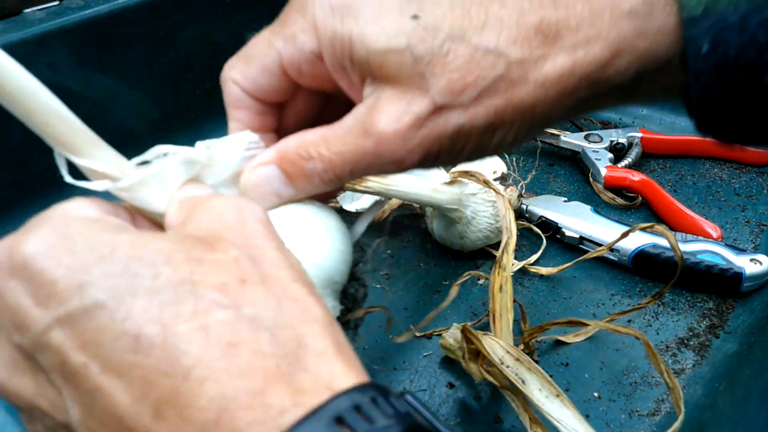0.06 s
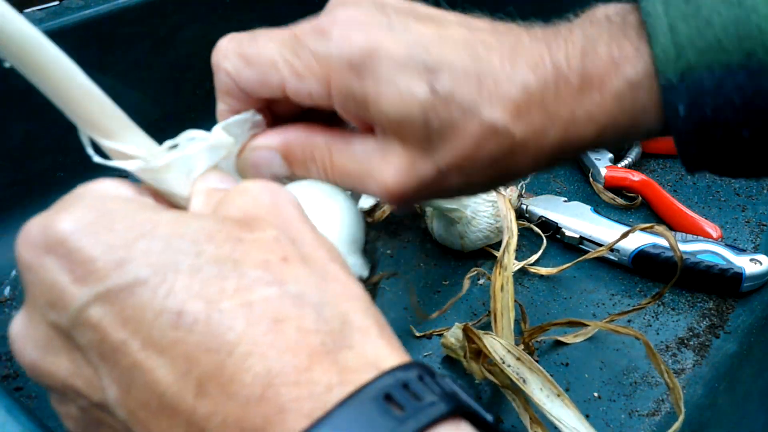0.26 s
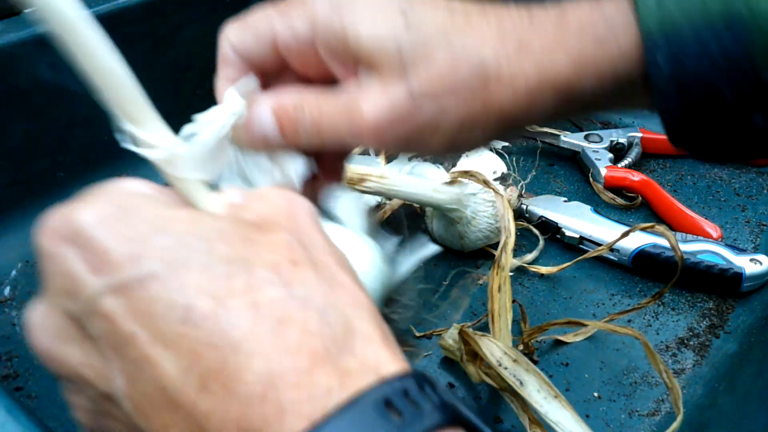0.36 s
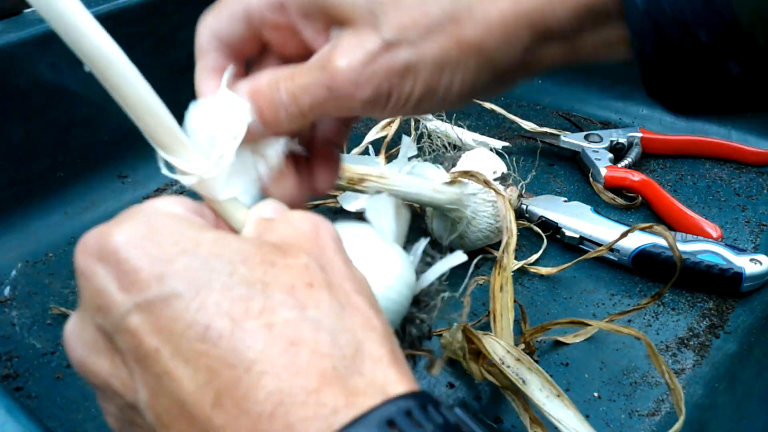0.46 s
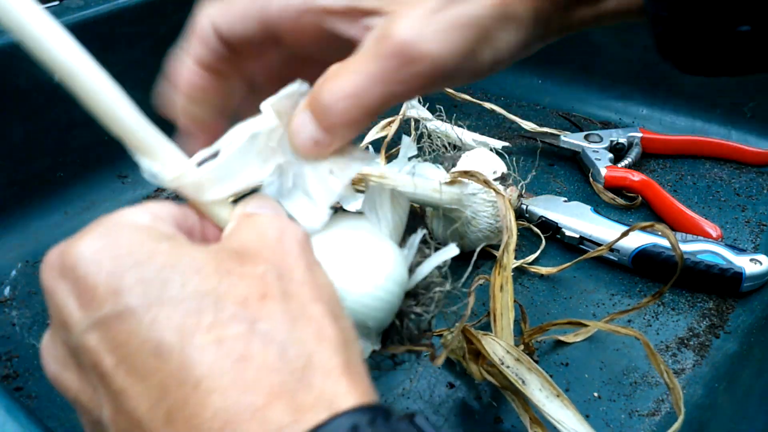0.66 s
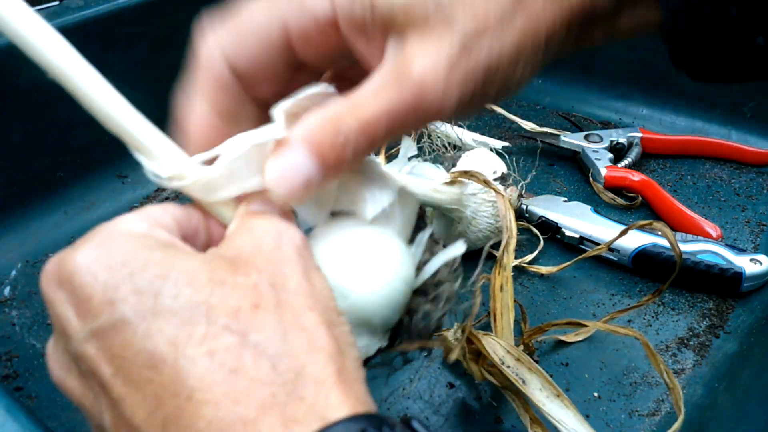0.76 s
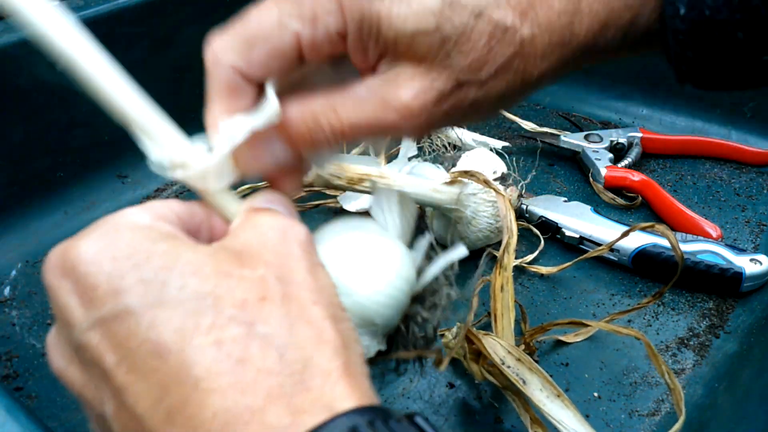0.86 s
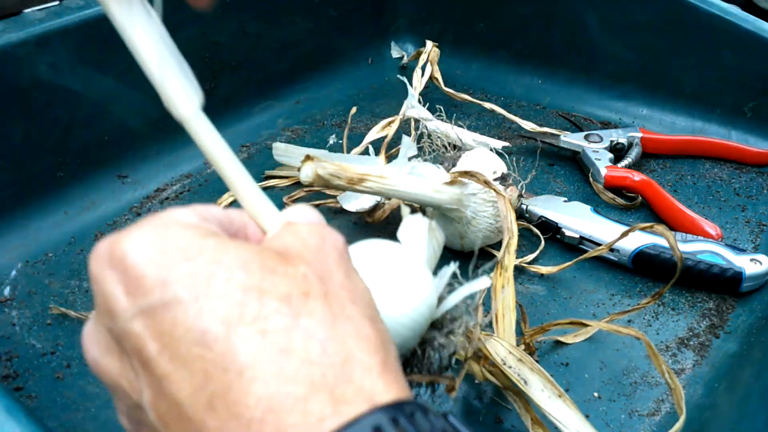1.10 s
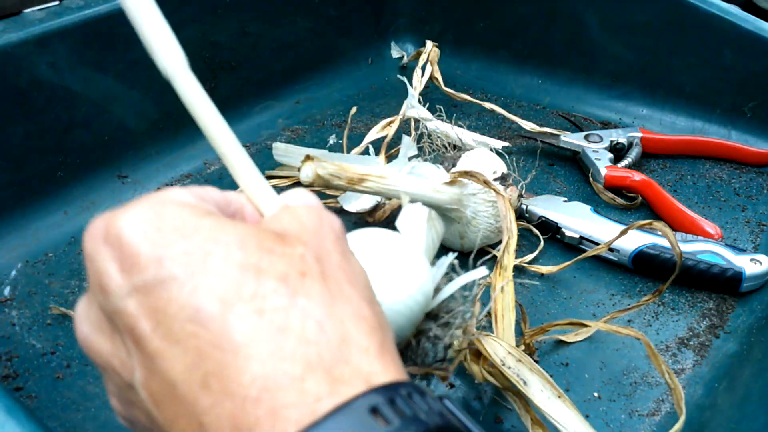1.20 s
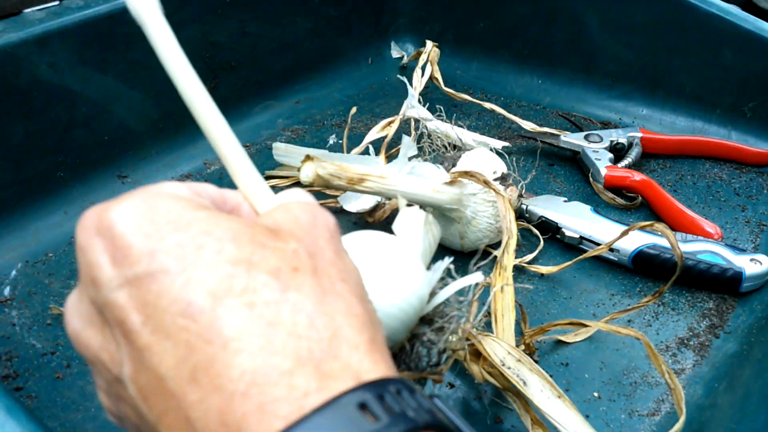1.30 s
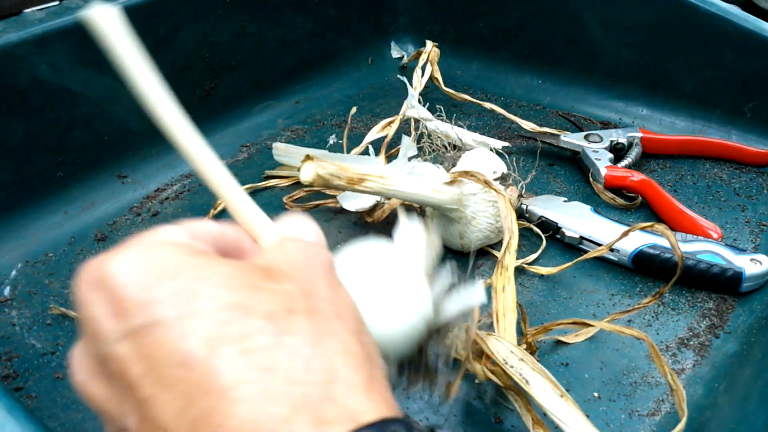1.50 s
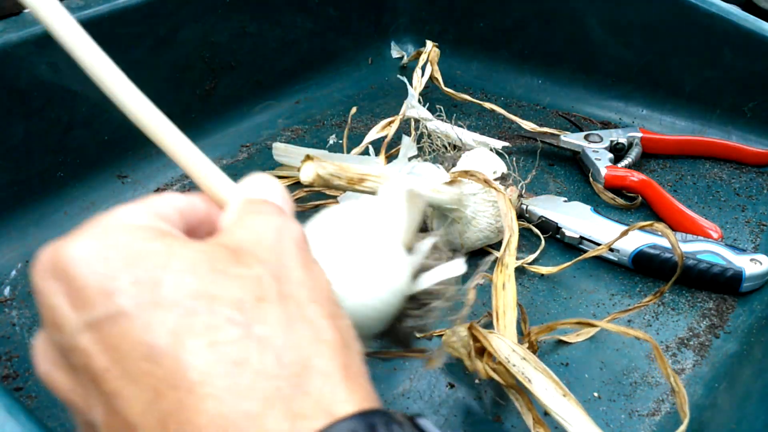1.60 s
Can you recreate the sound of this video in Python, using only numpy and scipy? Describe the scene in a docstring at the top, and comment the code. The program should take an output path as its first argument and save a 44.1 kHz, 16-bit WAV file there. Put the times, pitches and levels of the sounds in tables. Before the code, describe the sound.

Dry garlic skin is peeled by hand close to the microphone: a faint rustle, a sudden crackling rip, sparse papery crinkles along the stalk, then one last snap, over a faint low hum.

```python
"""Peeling a garlic bulb

Dry skin is peeled off a garlic bulb by hand, close to the microphone: it crinkles, rips in a quick run of snaps,
slides up the stalk with a papery rustle and lets go with one last snap. Clicks make the snaps, random crackle the
tearing and rustling, noise and a wandering tone the handling. A plastic tub rings faintly, and a low hum lies
underneath. The microphone rings sharply near 7 kHz and passes little above."""
import sys
import numpy as np
from scipy import signal
from scipy.fft import rfft, irfft, next_fast_len
from scipy.io import wavfile
from scipy.ndimage import uniform_filter1d, map_coordinates

SR = 44100
rng = np.random.default_rng(int(sys.argv[2]) if len(sys.argv) > 2 else 0)


def master(y):
    """Save y as 16-bit WAV."""
    cut = np.clip(np.atleast_2d(y).T, -1, 1)
    pcm = np.round(cut * 32767)  # scale
    wavfile.write(sys.argv[1], SR, pcm.astype(np.int16))


N = 72765
T = np.arange(N) / SR  # time in s


def amp(db):
    """Logarithmic level: 20 dB is a factor of ten in amplitude."""
    return 10 ** (np.asarray(db) / 20)


def unit(x):
    """Power normalisation: scale to rms 1."""
    return x / np.sqrt(np.mean(x ** 2) + 1e-20)


def along(points, hz):
    """Logarithmic frequency scale: interpolate (frequency, value) points along it."""
    f, v = np.transpose(points)
    return np.interp(np.log(hz + 1), np.log(f + 1), v)


def curve(rows, axis=1):
    """Linear interpolation: one column of a time table, per sample."""
    cols = np.transpose(rows)
    return np.interp(T, cols[0], cols[axis])


def coloured(x, points, lag=1):
    """Cepstral filter design: minimum phase at lag 1, nearer zero phase and tighter in time below that."""
    m = 2 * next_fast_len(N)
    response_db = along(points, np.fft.rfftfreq(m, 1 / SR))
    cepstrum = irfft(np.log(amp(response_db)), m)
    cepstrum[1:m // 2] *= 1 + lag
    cepstrum[m // 2 + 1:] *= 1 - lag
    response = np.exp(rfft(cepstrum))
    return irfft(rfft(x, m) * response, m)[:N]


def crackle(per_s, spread_db, hiss_db):
    """Random impulse process: tiny cracks of uneven size and either sign over a smooth hiss, rms 1."""
    sizes = amp(spread_db * np.minimum(rng.exponential(size=N), 3))
    happens = rng.random(N) < per_s / SR
    cracks = happens * sizes * rng.choice([-1, 1], N)
    hiss = amp(hiss_db) * rng.standard_normal(N)
    return unit(unit(cracks) + hiss)


def dying(s, t60):
    """Exponential decay: an envelope that starts at s and falls 60 dB in t60 seconds."""
    return (T >= s) * np.exp(-np.log(1000) * np.abs(T - s) / t60)


def flaking(x):
    """Time-varying spectrum: patches of gain shift the colour every few milliseconds, as flakes differ."""
    flake_db = 3.5  # rms unevenness before the overall gain is normalised
    z = signal.stft(x, nperseg=256)[2]
    across_hz = uniform_filter1d(rng.standard_normal(z.shape), size=5, axis=0)
    field = uniform_filter1d(across_hz, size=4, axis=1)
    gain = unit(amp(flake_db * unit(field)))
    return signal.istft(z * gain, nperseg=256)[1][:N]


def wobble(per_s):
    """Band-limited random modulation: a smooth curve through per_s random points a second, rms 1."""
    return unit(map_coordinates(rng.standard_normal(N // 20), [T * per_s]))


# single fractures of the skin, levels before the skin's colour; body_db is below 5.2 kHz relative to the treble
# columns: start_s, level_db, body_db
FRACTURES = [(.2108, -15, 17), (.2303, -7, 7), (.235, -6, -1), (.258, -12, 4), (.2602, -7, -2),
             (.2617, -1.5, 1), (.2695, -10, 3), (.321, 0, -26), (.3235, -5, -18), (.3312, -5, -8),
             (.3414, 10.5, -8), (.3443, 10, -1), (.3504, 8, -1), (.3548, 0, 0), (.3605, 6.5, -5),
             (.3682, 8, -5), (.3705, 3, -6), (.374, -3, 5), (.3772, 4, -1), (.3838, 7, -4), (.386, 1, -3),
             (.3893, 0, 7), (.3922, -3, 5), (1.3791, 7, -3), (1.3825, -7, -1), (1.386, -11, -5),
             (1.3905, -13, -3), (.555, -19, 2), (.614, -16, -8), (.669, -17, -5), (.692, -19.5, -1),
             (.756, -18, 3), (.830, -24, 13), (.884, -9, -9), (.891, -13, -1), (.914, -13, -15),
             (.931, -14, -9), (1.007, -13, -20), (1.068, -8.5, -4), (1.45, -17, -10)]
# radiation of the skin; columns: frequency_hz, gain_db
SKIN_RESPONSE = [(60, -30), (300, -7), (600, -8), (1000, -1.5), (1600, -3), (2600, -.5), (4000, -5),
                 (7000, -1)]
SPLINTER_DB, SPLINTER_T60_S = -9, .015  # splinters of the hardest snap, relative to its click
SOFTEN, SOFTEST_DB = .9, 20  # extra splinter dB per dB of weakness, and its limit in dB
LINGER = .4  # dB of splinter decay time per dB of softness


def snaps():
    """Brittle fracture: a sharp click trailed by splinters; weak ones crinkle longer, broad pieces have more body."""
    out = np.zeros(N)
    low = signal.butter(4, 5200, fs=SR, output="sos")
    for s, db, body_db in FRACTURES:
        loudness_db = db + max(body_db, 0)
        soft_db = np.clip(-SOFTEN * loudness_db, 0, SOFTEST_DB)
        t60 = SPLINTER_T60_S * amp(LINGER * soft_db)
        click = crackle(per_s=6000, spread_db=3, hiss_db=-8) * dying(s, t60)
        click *= amp(SPLINTER_DB + soft_db) / np.linalg.norm(click)
        click[round(s * SR)] += 1
        click /= np.linalg.norm(click)
        body = (amp(body_db) - 1) * signal.sosfiltfilt(low, click)
        out += amp(db) * (click + body)
    return coloured(out, SKIN_RESPONSE)


# skin being pulled and torn, level before its colour; columns: time_s, level_db
TEAR_LEVEL = [(.17, -73), (.193, -41), (.201, -48), (.22, -40), (.233, -37.5), (.25, -38.5), (.263, -29.5),
              (.285, -36), (.31, -72.5), (.335, -30), (.343, -21), (.392, -24), (.402, -39), (.414, -54),
              (.427, -82), (.44, -81.5)]
# spectrum of the tearing; columns: frequency_hz, gain_db
TEAR_SPECTRUM = [(60, -38), (250, -5), (450, -1), (650, -5), (950, 1), (1400, 1), (1900, 5.5), (2300, 1.5),
                 (3000, 4), (4500, 1), (7000, -3)]
# fingernail scraping under the skin before it lifts; columns: time_s, level_db
SCRAPE_LEVEL = [(.19, -59), (.2, -31), (.215, -29.5), (.226, -32.5), (.25, -65.5)]
# spectrum of the scrape; columns: frequency_hz, gain_db
SCRAPE_SPECTRUM = [(200, -36), (600, -18), (850, -2.5), (1400, 2.5), (2300, 5.5), (3300, 2.5),
                   (7000, -17.5)]


def tearing():
    """Progressive fracture: the nail scrapes, then fibres break in a dense crackle while the skin is pulled."""
    fibres = flaking(crackle(per_s=1600, spread_db=4.5, hiss_db=-7))
    tear = coloured(amp(curve(TEAR_LEVEL)) * fibres, TEAR_SPECTRUM)
    nail = unit(coloured(crackle(per_s=1500, spread_db=4, hiss_db=-4), SCRAPE_SPECTRUM))
    return tear + amp(curve(SCRAPE_LEVEL)) * nail


# skin sliding on skin and fingers, level before its colour; columns: time_s, level_db
RUSTLE_LEVEL = [(0, -47.5), (.028, -46), (.075, -53), (.125, -63.5), (.19, -45.5), (.41, -43), (.44, -54),
                (.5, -61), (.6, -72), (.63, -46.5), (.66, -64.5), (.74, -59), (.768, -41.5), (.81, -59.5),
                (.865, -55), (.888, -39), (.91, -59.5), (.97, -49), (1.07, -46), (1.12, -51), (1.15, -59.5),
                (1.22, -49), (1.28, -43), (1.315, -48.5), (1.34, -47), (1.385, -41), (1.42, -54.5),
                (1.51, -72), (1.55, -57), (1.6, -44), (1.65, -68)]
# spectrum of the rustle; columns: frequency_hz, gain_db
RUSTLE_SPECTRUM = [(100, -5.5), (500, -1.5), (1200, 1.5), (2400, 2), (3500, 1.5), (5000, 2), (7000, 2)]


def rustling():
    """Crumpling noise: loose skin crinkles as it slides."""
    crinkles = flaking(crackle(per_s=1500, spread_db=3, hiss_db=-4))
    return coloured(amp(curve(RUSTLE_LEVEL)) * crinkles, RUSTLE_SPECTRUM)


# soft rub of the hand along the stalk, level of its friction noise before the catches
# columns: time_s, level_db
RUB_LEVEL = [(0, -61), (.7, -60), (.77, -55), (.85, -63), (.89, -52), (.93, -58), (1.05, -53), (1.19, -62),
             (1.28, -48.5), (1.32, -48.5), (1.365, -46.5), (1.43, -66), (1.65, -64.5)]
# spectrum of the friction; columns: frequency_hz, gain_db
RUB_SPECTRUM = [(80, -14), (300, -4), (600, -1), (880, 4.5), (1300, -3), (1700, 0), (2500, -4), (3500, -20),
                (7000, -15)]
# jolts of the bulb in the hand as the skin gives; columns: start_s, level_db
BULB_JOLTS = [(0.343, -23), (0.389, -34), (1.062, -43.5), (1.379, -44.5)]
# spectrum of the jolts; columns: frequency_hz, gain_db
JOLT_SPECTRUM = [(40, -32), (120, -13), (230, -3), (320, -8), (440, 5), (580, 3), (720, -3), (950, -3),
                 (5000, -60)]
JOLT_T60_S = 0.045
CATCHES_PER_S, CATCH_DB = 70, 3.5  # random points per s of the rub's unevenness, and its rms in dB
# the stalk chafes in the grip: centre pitch in Hz, rms wander of log pitch, dB relative to the friction
CHAFE_HZ, CHAFE_GLIDE, CHAFE_DB = 850, .09, -7


def handling():
    """Friction and impact: the hand rubs the stalk in uneven, faintly pitched catches, and the bulb jolts dully."""
    pitch_hz = CHAFE_HZ * np.exp(CHAFE_GLIDE * wobble(20))
    phase = 2 * np.pi * np.cumsum(pitch_hz) / SR
    chafe = unit(sum(np.sin(k * phase) * wobble(2 * CATCHES_PER_S) / k for k in (1, 2)))
    friction = unit(coloured(flaking(crackle(per_s=900, spread_db=7, hiss_db=7)), RUB_SPECTRUM))
    rub_db = curve(RUB_LEVEL) + CATCH_DB * wobble(CATCHES_PER_S)
    rub = amp(rub_db) * (friction + amp(CHAFE_DB) * chafe)
    jolt = sum(amp(db) * dying(s, JOLT_T60_S) for s, db in BULB_JOLTS)
    thud = unit(coloured(rng.standard_normal(N), JOLT_SPECTRUM))
    return rub + jolt * thud


# resonances of the plastic tub; columns: frequency_hz, width_hz, level_db
TUB_MODES = [(486, 53, -25.5), (840, 180, -15.5), (1042, 24, -6), (1890, 27, -0.5), (2940, 170, -3)]


def tub(x):
    """Modal resonance: the tub under the hands rings in narrow bands, each a second-order band-pass."""
    m = 2 * next_fast_len(N)
    f = np.fft.rfftfreq(m, 1 / SR)
    response = sum(amp(db) * 1j * f * w / (hz * hz - f * f + 1j * f * w) for hz, w, db in TUB_MODES)
    return irfft(rfft(x, m) * response, m)[:N]


# decay time of the reflections; columns: frequency_hz, t60_s
ROOM_DECAY = [(200, 0.11), (2000, 0.035), (7000, 0.064)]
ROOM_DB = -6  # energy of the reflections relative to the direct impulse


def room(x):
    """Reverberation: short reflections from the tub and the space around it, as decaying noise."""
    hz, t, z = signal.stft(rng.standard_normal(SR // 2), SR, nperseg=256)
    decay = np.exp(-np.log(1000) * t / along(ROOM_DECAY, hz)[:, None])
    tail = signal.istft(z * decay, SR, nperseg=256)[1]
    return signal.fftconvolve(x, tail / np.linalg.norm(tail))[:N]


# wandering low hum; columns: time_s, pitch_hz, level_db
HUM_TRACK = [(0, 103.9, -60), (.09, 112.2, -52.5), (.4, 116.1, -48.5), (.7, 120.3, -50.5),
             (1.15, 124.1, -53), (1.35, 133.8, -61), (1.5, 124.6, -53), (1.65, 116, -84)]
# steady tones of the hum; columns: pitch_hz, level_db
DRONE_TONES = [(93, -63), (187, -67.5), (279, -60.5)]
# spectrum of the rumble; columns: frequency_hz, gain_db
RUMBLE_SPECTRUM = [(20, -9.5), (95, 2), (155, 2), (195, 8), (270, -1), (360, 2.5), (600, -11), (1500, -27),
                   (4000, -33.5), (9000, -38)]
RUMBLE_DB = -52.5


def background():
    """Tones in noise: a low hum that rises, then falls, and a few steady tones over a soft rumble."""
    phase = 2 * np.pi * np.cumsum(curve(HUM_TRACK)) / SR
    hum = amp(curve(HUM_TRACK, axis=2)) * unit(np.sin(phase))
    drone = sum(amp(db) * unit(np.sin(2 * np.pi * (hz * T + rng.random()))) for hz, db in DRONE_TONES)
    rumble = amp(RUMBLE_DB) * unit(coloured(rng.standard_normal(N), RUMBLE_SPECTRUM))
    return hum + drone + rumble


def scene():
    """Superposition: the peeling, the tub's ring, the reflections and the background add."""
    garlic = snaps() + tearing() + rustling() + handling()
    reflections = amp(ROOM_DB) * room(garlic)
    return (garlic + tub(garlic) + reflections + background())[None]


# response of the microphone; columns: frequency_hz, gain_db
MIC_RESPONSE = [(20, -2), (3600, -.5), (4400, .5), (5400, 1), (6100, 7), (6500, 12.5), (6850, 16.3),
                (7250, 16), (7480, -18.5), (7900, -42), (8500, -34), (8730, -11), (9000, -20), (9450, -51),
                (12000, -62)]


def record(dry):
    """Transducer response: the microphone's ringing treble peak, then the band limit."""
    limit = signal.cheby1(12, .1, 11600, fs=SR, output="sos")  # order, ripple in dB, top in Hz
    heard = coloured(dry[0], MIC_RESPONSE, lag=0.58)
    return signal.sosfilt(limit, heard)[None]


dry = scene()
out = record(dry)
master(out)
```